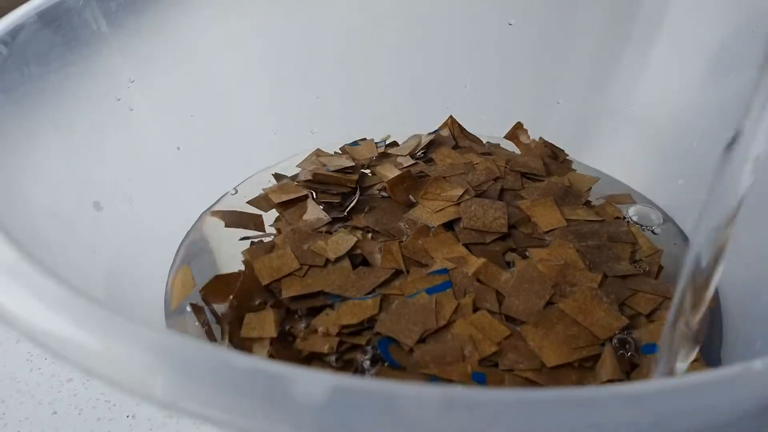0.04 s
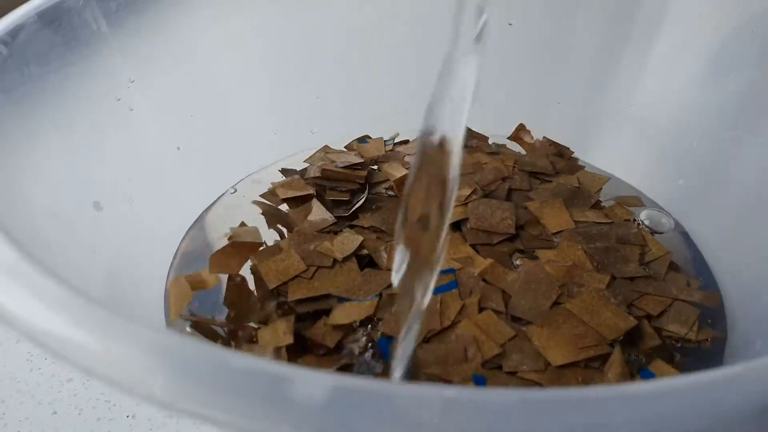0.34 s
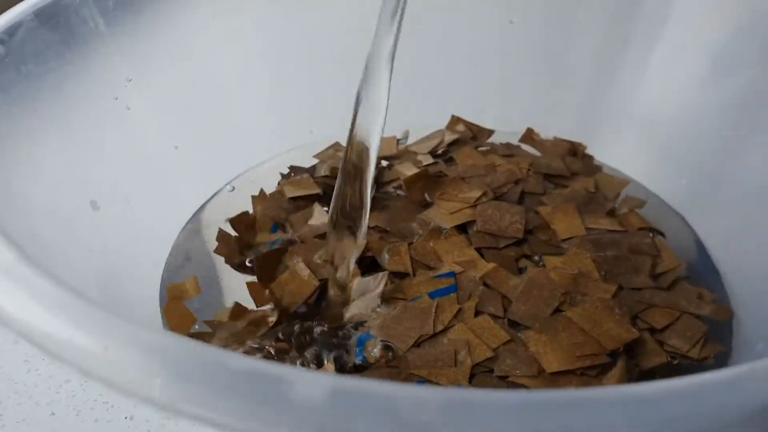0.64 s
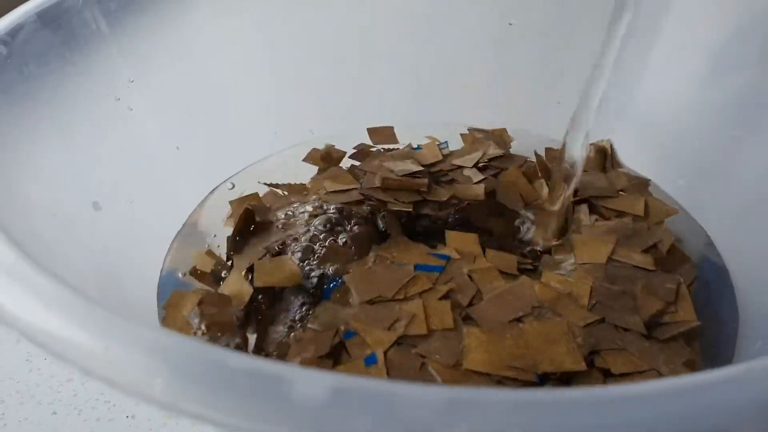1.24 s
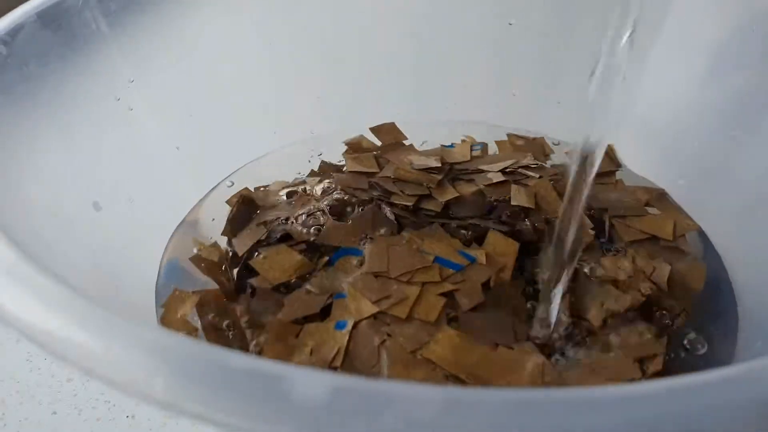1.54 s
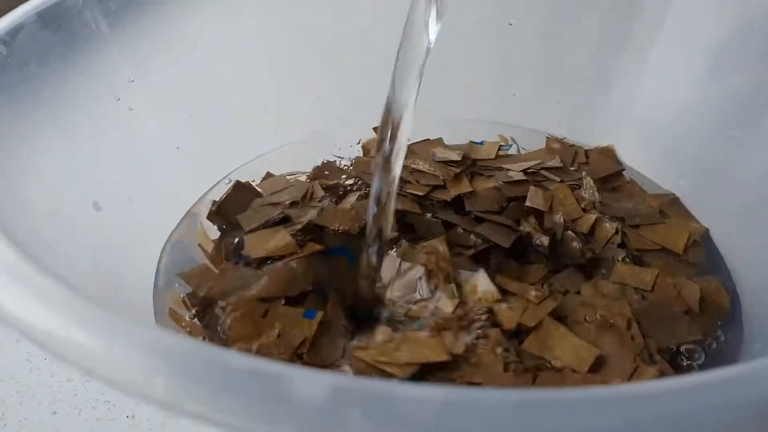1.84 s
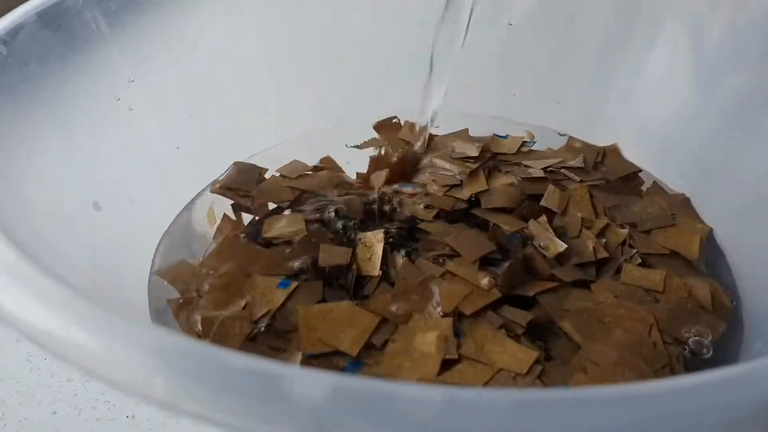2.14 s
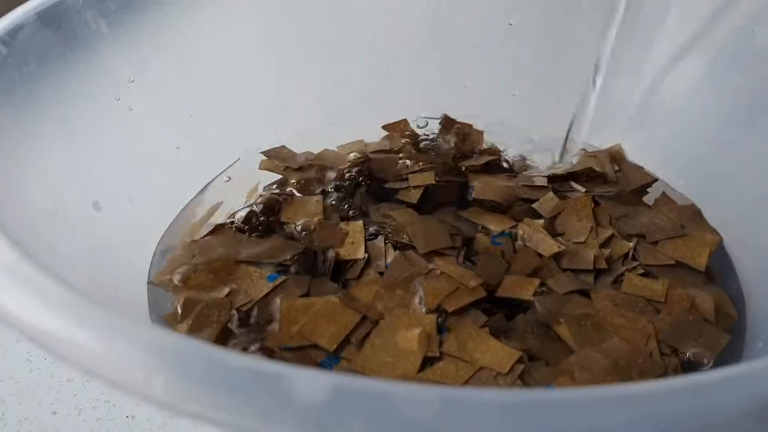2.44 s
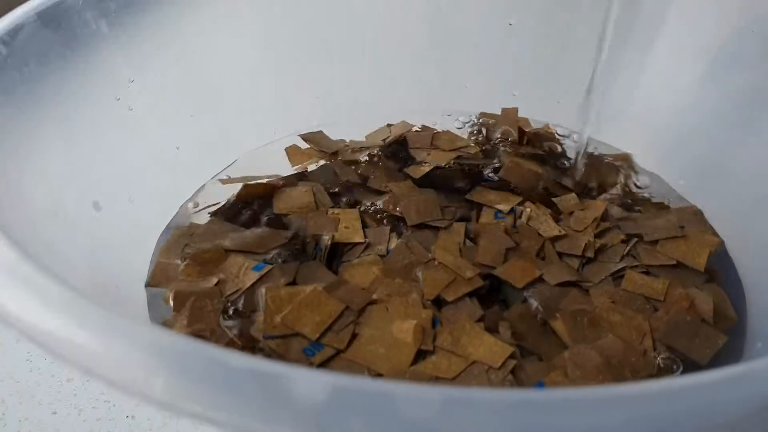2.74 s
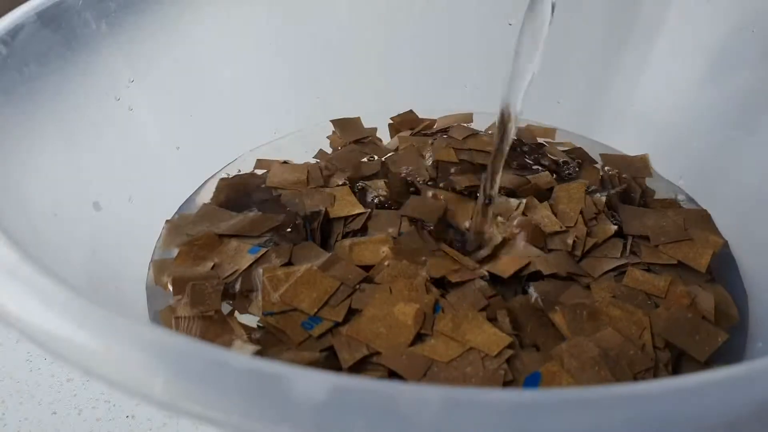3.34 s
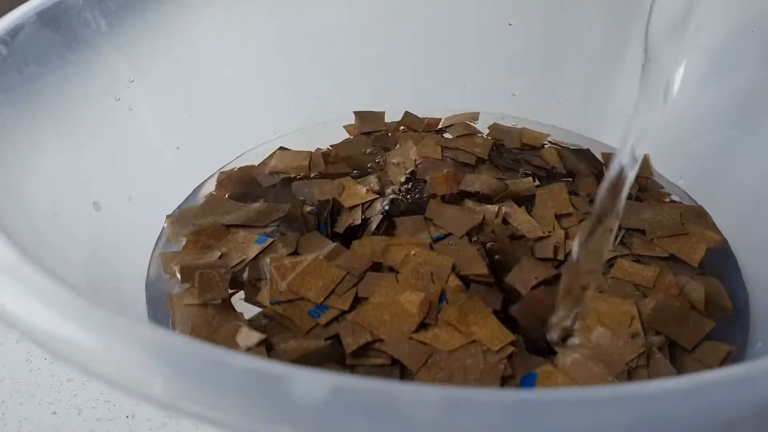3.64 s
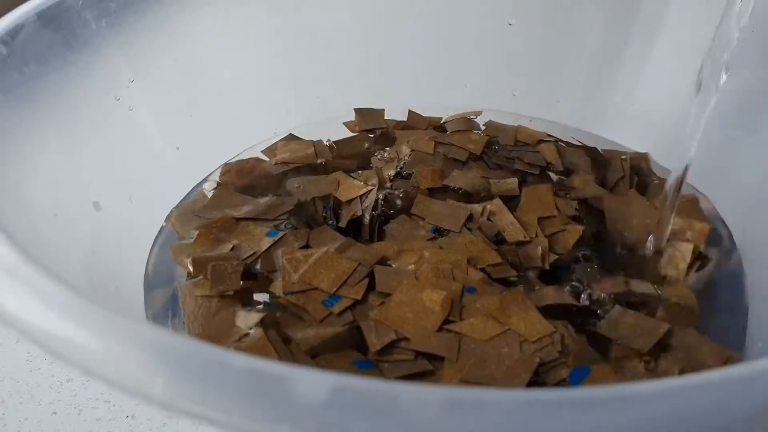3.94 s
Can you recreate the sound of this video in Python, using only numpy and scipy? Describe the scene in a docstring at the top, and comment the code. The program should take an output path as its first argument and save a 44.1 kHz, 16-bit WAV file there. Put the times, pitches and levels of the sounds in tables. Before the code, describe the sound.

A thin stream of water trickles close by onto wet paper in a plastic tub, with plops, tiny bubbles, sharp drop ticks and soft hollow drumming. It swells around 0.5 seconds and eases from about 1.3 to 1.9. The strongest plops and splashes come between 2 and 3.3 seconds. The trickle thins near 3.7, then picks up just before 4. The small, still room adds a short tail.

```python
"""Close trickling and plopping: a thin stream of water wanders over wet paper scraps in a plastic tub.
It traps air pockets that plop, sheds small bubbles and fine spray, and drums on the tub; drops snap
on the floating paper. The tub's walls echo at once, the air inside rings, and a small, still room
adds a short tail."""
import sys
import numpy as np
from scipy import signal
from scipy.fft import rfft, irfft
from scipy.io import wavfile

SR = 44100
rng = np.random.default_rng(int(sys.argv[2]) if len(sys.argv) > 2 else 0)


def to_wav(sig):
    """Store sig (one row per channel, or 1-D mono) as 16-bit WAV at the path in sys.argv[1].

    Samples outside -1..1 are clipped; the rate is SR.
    """
    pcm = np.clip(np.atleast_2d(sig), -1, 1) * 32767
    pcm = np.round(pcm).astype(np.int16)
    wavfile.write(sys.argv[1], SR, pcm.T)  # frames by channels


N = 176400

# Pour strength, harder on open water, softer on paper: time_s, plop_db, bubble_db, spray_db, drum_db
POUR_LEVELS = [(0, -54, -60.5, -56.5, -62.5), (0.11, -66, -62.5, -57, -62), (0.15, -52.5, -55.5, -59, -66),
               (0.3, -53, -58, -56, -56), (0.42, -48, -54.5, -53.5, -52.5), (0.55, -45.5, -48.5, -49, -48),
               (0.63, -53.5, -56, -54, -52.5), (0.71, -52.5, -55.5, -54.5, -56.5),
               (0.8, -50.5, -53, -50.5, -53), (0.93, -49, -54, -50, -52.5), (1.04, -57.5, -54.5, -50, -51),
               (1.11, -62, -60.5, -60, -53), (1.2, -56, -57, -52.5, -59.5), (1.4, -72.5, -70, -70.5, -63),
               (1.45, -63, -57.5, -60.5, -61.5), (1.55, -61, -61, -60, -59.5), (1.72, -55.5, -69, -63, -58),
               (1.9, -61, -63.5, -59, -64), (1.966, -44, -50.5, -50.5, -48), (2.06, -58, -55, -55, -61.5),
               (2.132, -43, -50, -45.5, -52), (2.18, -57, -60, -55, -63), (2.23, -46, -54.5, -54.5, -46),
               (2.34, -52.5, -56, -53, -65), (2.488, -41.5, -49.5, -51, -50.5),
               (2.59, -61.5, -60.5, -57.5, -64), (2.8, -62.5, -66, -54.5, -52),
               (2.978, -54, -55, -54, -53.5), (3.1, -55.5, -74, -65, -59.5), (3.23, -68, -67, -65, -72),
               (3.3, -58, -66, -60, -55.5), (3.5, -57.5, -57, -52.5, -61.5), (3.641, -76, -74, -68.5, -76),
               (3.751, -77.5, -77, -64, -62), (3.851, -57, -61.5, -55, -63.5), (4, -49.5, -51, -49, -44)]
# Splash spectrum: freq_hz, gain_db
SPLASH_SPECTRUM = [(240, -15), (400, -11), (697, -5.5), (1010, -4.5), (1090, -9), (1420, -2), (1790, -6),
                   (2050, -1), (2800, -3.5), (4730, -3), (7280, -9), (8900, 2), (11900, -3), (15000, -3),
                   (16000, -11)]
# Large drops that trap air: start_s, level_db, pitch_hz, tub_push_db, cycles_to_crest
PLOPS = [(0.1328, -39, 764, -51, 0.38), (0.15, -44.5, 720, -77, 1.3), (0.2221, -43, 820, -54, 0.35),
         (0.246, -38, 700, -49, 0.91), (0.319, -32.5, 2050, -74, 0.6), (0.323, -43.5, 710, -57, 1.2),
         (0.342, -40, 2090, -54, 0.6), (0.3714, -36, 1580, -46.5, 1.2), (0.4113, -40, 700, -49, 0.76),
         (0.5315, -39, 685, -50, 0.68), (0.587, -37.5, 630, -55, 0.98), (0.741, -36.5, 1260, -60, 0.54),
         (0.791, -39, 820, -68, 0.96), (0.81, -34, 850, -70, 0.47), (0.89, -42, 680, -53, 0.68),
         (1.0171, -32.5, 970, -48.5, 0.41), (1.074, -40.5, 930, -56, 0.46), (1.207, -46, 880, -60.5, 0.72),
         (1.267, -43.5, 760, -59, 0.4), (1.441, -47, 750, -79, 0.78), (2.105, -34, 850, -51, 0.39),
         (2.117, -36.5, 1360, -44, 1.3), (2.132, -38, 700, -60, 0.97), (2.2035, -33, 1350, -54, 0.37),
         (2.267, -29, 805, -45.5, 0.25), (2.312, -30, 1470, -48, 0.6), (2.3499, -31.5, 1520, -49.5, 0.6),
         (2.4012, -36.5, 1570, -70, 0.59), (2.4352, -28.5, 815, -41.5, 0.24), (2.4539, -38, 1470, -43, 1.1),
         (2.4847, -41, 1400, -48, 1), (2.4947, -40, 590, -43.5, 1.5), (2.5256, -29, 646, -39.5, 0.43),
         (2.6292, -39.5, 1010, -51.5, 0.25), (2.9237, -29.5, 1320, -49, 0.47),
         (2.9453, -29.5, 1330, -48, 0.49), (2.9675, -25.5, 1330, -47, 0.91), (3.0357, -36, 1250, -63, 0.73),
         (3.256, -39, 1190, -70, 1.4), (3.284, -29.5, 1070, -45, 1.33), (3.575, -44, 930, -59.5, 1.65),
         (3.975, -37, 764, -49, 0.84), (3.985, -41, 680, -44, 1.1)]
# Small bubbles popping: start_s, level_db, pitch_hz
PIPS = [(0.133, -33.5, 2210), (0.2002, -32.5, 2200), (0.463, -20.5, 5550), (0.7825, -30, 3940),
        (0.9156, -31.5, 2480), (0.939, -39, 2130), (1.1352, -28, 4540), (1.7387, -41.5, 2400),
        (1.953, -40.5, 1940), (2.2183, -27.5, 4170), (2.369, -26, 4630), (2.668, -36, 3600),
        (2.841, -27, 5960), (2.8969, -25.5, 5140), (2.9235, -29, 3700), (3.1067, -33.5, 4000),
        (3.2744, -31, 3140), (3.673, -37, 4874), (3.815, -38, 6200), (3.957, -34.5, 4730)]
# Drops snapping on wet paper: start_s, level_db, pitch_hz, splat_energy_db
SNAPS = [(0.4634, -28.5, 10900, -14), (0.4684, -42, 9200, -18), (0.5133, -35, 9100, -16.5),
         (0.5879, -18.5, 10440, -12), (0.6447, -34.5, 11100, -18), (0.8188, -21.5, 12200, -12),
         (0.8909, -22, 9800, -14), (0.9329, -22, 8500, -33), (1.0177, -26, 11400, -19),
         (1.1242, -33, 14300, -33), (1.9602, -12.5, 13700, -16), (2.1038, -25.5, 11600, -38),
         (2.1939, -24, 10200, -30), (2.1967, -22.5, 10000, -17), (2.4719, -26, 10000, -16),
         (2.4945, -31, 8850, -16), (2.5264, -16, 8930, -15), (2.6271, -29, 13200, -14.5),
         (2.7682, -26.5, 10200, -21.5), (2.8479, -23.5, 8540, -19), (3.2553, -21, 11060, -8.5),
         (3.2573, -29, 12400, -17), (3.2839, -24.5, 9200, -9), (3.3799, -27.5, 12300, -21.5),
         (3.7686, -25.5, 10030, -31), (3.8991, -38, 11900, -15), (3.9883, -23.5, 9900, -10)]
# Flurries of like-sized bubbles: start_s, length_s, level_db, pitch_hz
FLURRIES = [(0, 0.16, -61, 2150), (0.432, 0.057, -46.5, 5500), (0.64, 0.039, -54, 3750),
            (0.765, 0.064, -52.5, 3830), (1.57, 0.26, -71.5, 2110), (3.37, 0.27, -63.5, 1040),
            (3.485, 0.034, -53.5, 4645)]
# Modes of the water-laden tub: freq_hz, level_db, t60_s
TUB_MODES = [(109, -6, 0.11), (194.3, -8.5, 0.19), (223.5, 4.5, 0.12), (245.6, -5.5, 0.36),
             (279.5, -7, 0.31), (442.2, -13, 0.14), (687, -4.5, 0.068)]
# Water rumble spectrum: freq_hz, gain_db
RUMBLE_SPECTRUM = [(22, -35), (39, 1), (54, 2.5), (72, -4.5), (100, -0.5), (140, -14.5), (300, -27),
                   (700, -33)]
# Air resonances in the tub: freq_hz, level_db
CAVITY_MODES = [(846, -6), (1024, 7), (1157, 0), (1217, 3), (1481, 1), (1990, 3.5), (2120, 8.5)]
# Tub wall echoes: delay_s, gain
WALL_ECHOES = [(.0064, 0.095), (.0094, 0.24), (0.0186, 0.23)]
# Room decay: freq_hz, t60_s
ROOM_DECAY = [(200, 0.41), (1000, 0.089), (3000, 0.16), (8000, 0.046), (16000, 0.05)]
# Still room spectrum: freq_hz, gain_db
HUSH_SPECTRUM = [(30, -15), (200, 12), (400, 2), (2000, -53.5), (16000, -43)]

PLOP, BUBBLE, SPRAY, DRUM = 1, 2, 3, 4  # POUR_LEVELS columns
SPOTS = 8  # landing spots in the tub


def splashing():
    """The stream: plops, small bubbles, spray and patter share the same gushes."""
    gush = amp(6 * wobble(below_hz=110))
    plops = swarm(gush, low_hz=422, high_hz=2560, per_s=1300, cycles=0.6, spread_db=4.5)
    pips = swarm(gush, low_hz=2344, high_hz=7380, per_s=1600, cycles=1.5, spread_db=6.5)
    spray = swarm(gush, low_hz=6300, high_hz=15900, per_s=800, cycles=2.15, spread_db=3.0)
    bubbles = amp(-8.5) * plops * pour(PLOP) + pips * pour(BUBBLE) + amp(-2.5) * spray * pour(SPRAY)
    return bubbles + amp(-3.8) * patter(gush)


def pour(column):
    """Gain over time for one part of the pour."""
    rows = np.array(POUR_LEVELS)
    return amp(np.interp(np.arange(N) / SR, rows[:, 0], rows[:, column]))


def bubble(hz, cycles, swell=1.35, chirp=0.0041):
    """Air pocket damped by wet paper: crests after `cycles`, dies away, rises slightly in pitch."""
    age = np.arange(0, 8, hz / cycles / SR)  # 1 at the crest
    envelope = (age * np.exp(1 - age)) ** swell
    return envelope * np.sin(2 * np.pi * cycles * (age + chirp * age ** 2))


def swarm(gush, low_hz, high_hz, per_s, cycles, spread_db, kinds=60):
    """Bubbles of random size, damping, strength and spot, bunched by the gushes."""
    born = rng.random(N) < per_s * unit_rms(gush) / SR
    gain = amp(spread_db * np.minimum(rng.exponential(1, N), 3.5))
    kind, spot = rng.integers(0, kinds, N), rng.integers(0, SPOTS, N)
    shapes = [bubble(hz, cycles * rng.uniform(0.46, 2.35)) * rng.choice([-1, 1])
              for hz in np.linspace(low_hz, high_hz, kinds)]
    shapes = [shape / np.linalg.norm(shape) for shape in shapes]
    out = np.zeros((SPOTS, N))
    for i in np.flatnonzero(born):
        add(out[spot[i]], i / SR, shapes[kind[i]] * gain[i])
    return unit_rms(coloured(out, SPLASH_SPECTRUM)) / np.sqrt(SPOTS)


def patter(gush, per_s=220):
    """Droplets tick on wet paper: sharp clicks across the plop, bubble and spray bands."""
    lands = rng.random((SPOTS, N)) < per_s * unit_rms(gush) / SR / SPOTS
    polarity = rng.choice([-1, 1], lands.shape)
    gain = amp(4.45 * np.minimum(rng.exponential(1, lands.shape), 3))
    clicks = coloured(lands * polarity * gain, SPLASH_SPECTRUM)
    out = 0
    for column, band_hz in (PLOP, [450, 2400]), (BUBBLE, [2400, 7000]), (SPRAY, [7000, 16000]):
        band = signal.butter(2, band_hz, "band", fs=SR)
        out += unit_rms(signal.lfilter(*band, clicks)) * pour(column)
    return out / np.sqrt(SPOTS)


def drops(slap_s=0.000071, splat_s=0.0011):
    """Single loud drops, spread over the spots: a slap and plop, a pip, or a snap and droplet splat."""
    out, t = np.zeros((SPOTS, N)), np.arange(800) / SR
    slap = np.gradient((t / slap_s) ** 2 * np.exp(-t / slap_s))
    for k, (start_s, db, hz, _, cycles) in enumerate(PLOPS):
        add(out[k % SPOTS], start_s, amp(db) * bubble(hz, max(cycles, 0.3), swell=0.76))
        add(out[k % SPOTS], start_s, amp(db) * slap / slap.max())
    for k, (start_s, db, hz) in enumerate(PIPS):
        add(out[k % SPOTS], start_s, amp(db) * bubble(hz, cycles=1.67))
    splat_band = signal.butter(2, [1500, 12000], "band", fs=SR)
    for k, (start_s, db, hz, splat_db) in enumerate(SNAPS):
        droplets = rng.standard_normal(len(t)) ** 3 * np.exp(-t / splat_s)
        splat = signal.lfilter(*splat_band, droplets / np.linalg.norm(droplets))
        add(out[k % SPOTS], start_s, amp(db) * bubble(hz, cycles=1.43))
        add(out[k % SPOTS], start_s, amp(splat_db) * splat)
    return out


def flurries(per_s=330, pitch_spread=0.085):
    """The stream bores into one spot: a gurgle or fizz around one pitch swells and fades."""
    out = np.zeros((SPOTS, N))
    for k, (start_s, length_s, db, hz) in enumerate(FLURRIES):
        flurry = np.zeros(round(length_s * SR))
        for slot_s, detune in zip(np.arange(0, length_s, 1 / per_s), rng.standard_normal(SR)):
            ring = bubble(hz * np.exp(pitch_spread * detune), cycles=4.5)
            add(flurry, slot_s + rng.random() / per_s, rng.standard_normal() * ring)
        envelope = np.sqrt(np.hanning(len(flurry)))
        add(out[k % SPOTS], start_s, amp(db) * unit_rms(flurry * envelope))
    return out


def tub(push_s=0.0027):
    """The stream and each large air pocket push on the tub, which rings; the water rumbles below."""
    t, pushes = np.arange(SR // 2) / SR, np.zeros((1, N))
    ring = sum(amp(db - 60 * t / t60_s) * np.sin(2 * np.pi * hz * t + 0.28 * rng.standard_normal((2, 1)))
               for hz, db, t60_s in TUB_MODES)
    ring *= 1 - np.exp(-t / push_s)
    for start_s, _, _, push_db, _ in PLOPS:
        add(pushes[0], start_s, amp([push_db]))
    drumming = amp(-4.5) * unit_rms(convolve(stereo_noise(width=0.46), ring)) * pour(DRUM)
    rumble = unit_rms(coloured(stereo_noise(width=0.33), RUMBLE_SPECTRUM))
    rumble *= amp(0.5) * np.sqrt(pour(BUBBLE) * pour(DRUM))
    return convolve(pushes, ring) + drumming + rumble


def cavity(water, t60_s=0.13, level_db=-17.5):
    """The air in the tub rings on after each splash."""
    t = np.arange(SR // 3) / SR
    ring = sum(amp(db - 60 * t / t60_s) * np.sin(2 * np.pi * (hz * t + rng.random((2, 1))))
               for hz, db in CAVITY_MODES)
    return amp(level_db) * convolve(water[None], ring / np.linalg.norm(ring[0]))


def sound_paths(spot, travel_s=0.0006, scatter_s=0.012, scatter_db=-3, room_db=-9.5, pan_db=1.49):
    """Direct sound from one spot, left side first; then wall echoes, tub scatter and room tail."""
    t = np.arange(SR // 3) / SR
    early = np.zeros((2, len(t)))
    right_lag_s = 0.0001 + 0.00004 * rng.uniform(-1, 1)
    for side in (0, 1):
        add(early[side], travel_s + side * right_lag_s, [1.])
        for delay_s, gain in WALL_ECHOES:
            echo_s = travel_s + delay_s * (1 + 0.13 * rng.uniform(-1, 1))
            add(early[side], echo_s, gain * np.hanning(5) / 2)
    scatter, tail = rng.standard_normal((2, 2, len(t))) * (t > travel_s + 0.001)
    scatter *= np.exp(-t / scatter_s)
    hz, frame_s, spectra = signal.stft(tail, SR, nperseg=256)
    spectra *= amp(-60 * frame_s / log_interp(ROOM_DECAY, hz)[:, None])
    tail = signal.istft(spectra, SR, nperseg=256)[1][:, :len(t)]
    response = early + amp(scatter_db) * scatter / np.linalg.norm(scatter[0])
    response += amp(room_db) * tail / np.linalg.norm(tail[0])
    return convolve(spot[None], response) * amp([[pan_db], [-pan_db]])


def room_hush(level_db=-78):
    """Faint low noise of the still room."""
    return amp(level_db) * unit_rms(coloured(rng.standard_normal((2, N)), HUSH_SPECTRUM))


def amp(db):
    """Decibels to gain."""
    return 10 ** (np.asarray(db) / 20)


def unit_rms(x):
    """Scales to an rms of one."""
    return x / np.sqrt(np.mean(x ** 2) + 1e-20)


def log_interp(points, hz):
    """Reads a table on a log-frequency axis."""
    freq_hz, value = np.transpose(points)
    return np.interp(np.log(hz + 1), np.log(freq_hz + 1), value)


def coloured(x, spectrum):
    """Filters by a spectrum table."""
    return irfft(rfft(x) * amp(log_interp(spectrum, np.fft.rfftfreq(N, 1 / SR))), N)


def wobble(below_hz):
    """Low-passed noise, unit rms."""
    return unit_rms(irfft(rfft(rng.standard_normal(N)) * (np.fft.rfftfreq(N, 1 / SR) < below_hz), N))


def stereo_noise(width):
    """Shared noise plus a separate part per side."""
    return rng.standard_normal(N) + width * rng.standard_normal((2, N))


def convolve(x, response):
    """Applies a stereo response, cut to N samples."""
    return signal.fftconvolve(x, response, axes=1)[:, :N]


def add(mix, start_s, sound):
    """Mixes a sound in at start_s."""
    part = mix[max(round(start_s * SR), 0):][:len(sound)]
    part += sound[:len(part)]


def scene():
    """Water and tub over the still room."""
    hush = room_hush()
    water = splashing() + flurries() + drops()
    return sum(sound_paths(spot) for spot in water) + cavity(water.sum(0)) + tub() + hush


def record(dry):
    """Band limit: 16 kHz low-pass."""
    lowpass = signal.firwin(255, 16000, window=("kaiser", 8), fs=SR)
    return signal.oaconvolve(dry, lowpass[None], "same")


dry = scene()
out = record(dry)
to_wav(out)
```